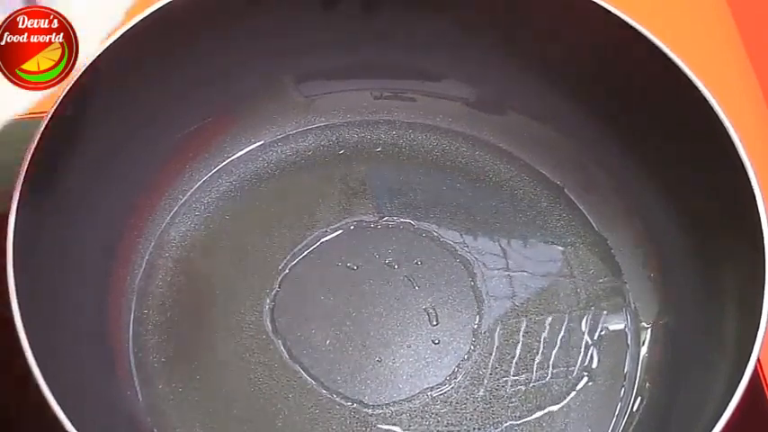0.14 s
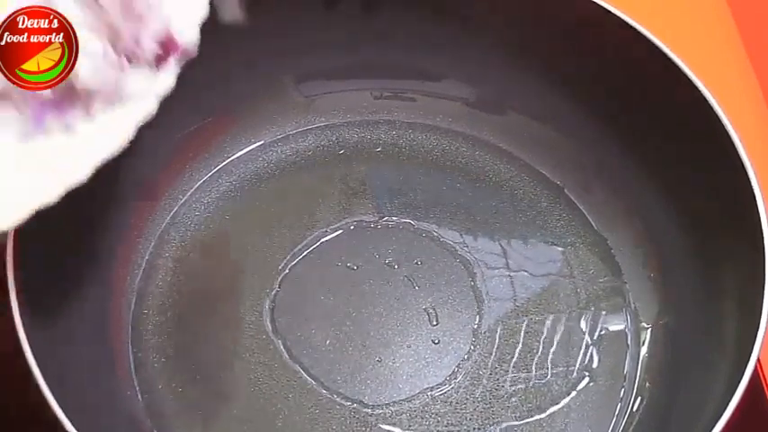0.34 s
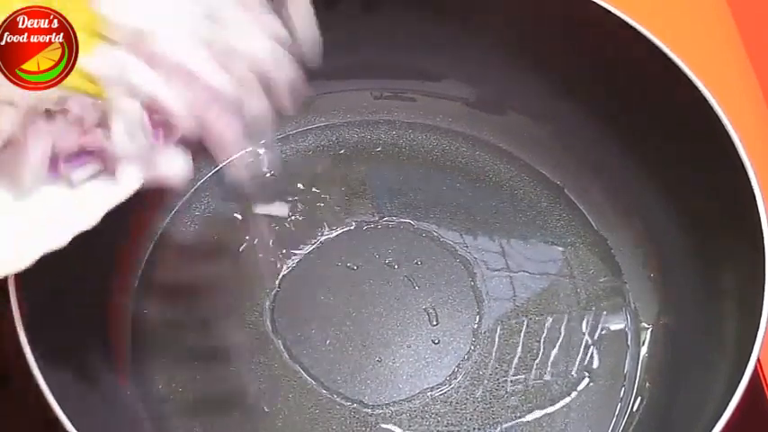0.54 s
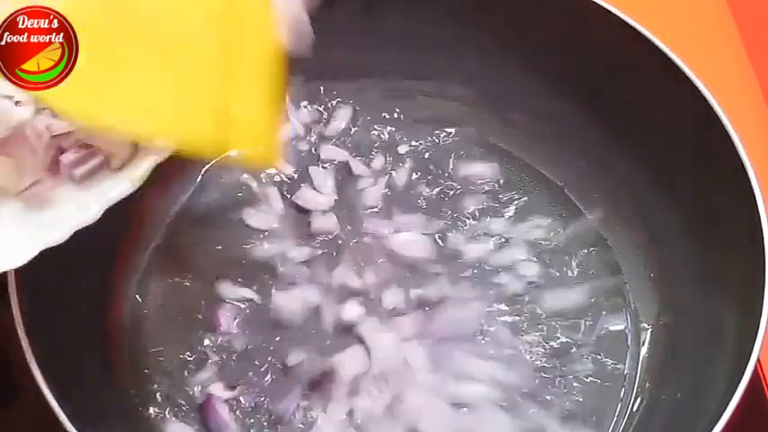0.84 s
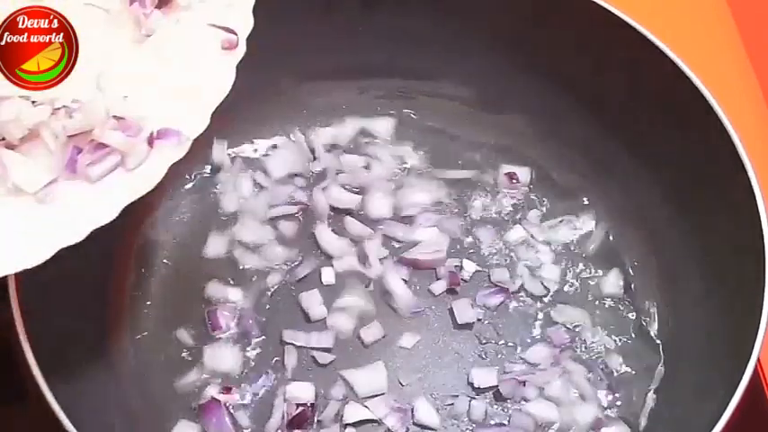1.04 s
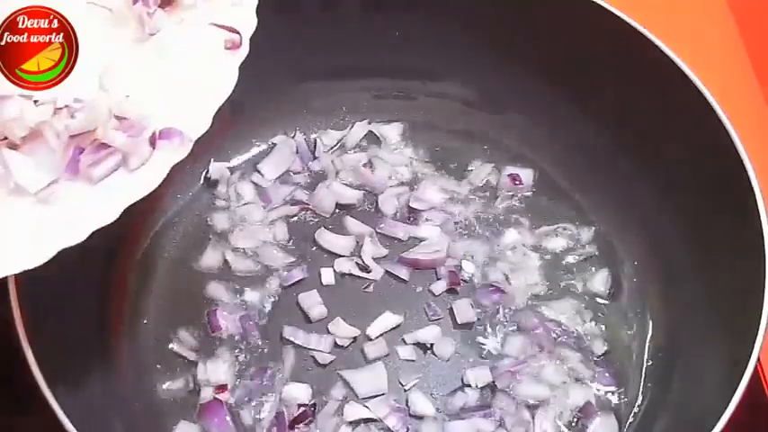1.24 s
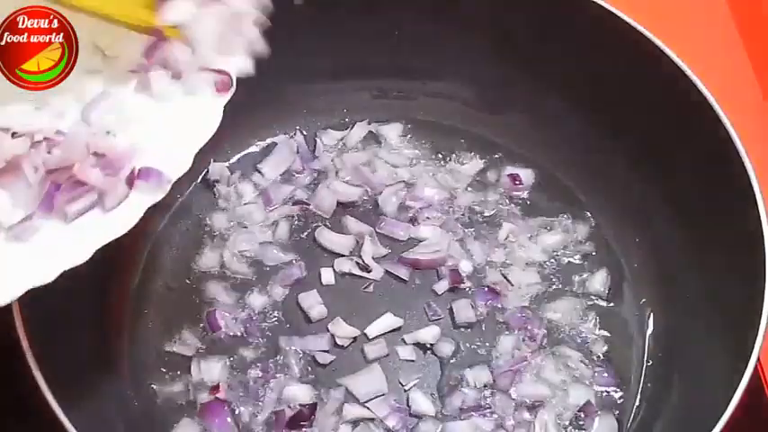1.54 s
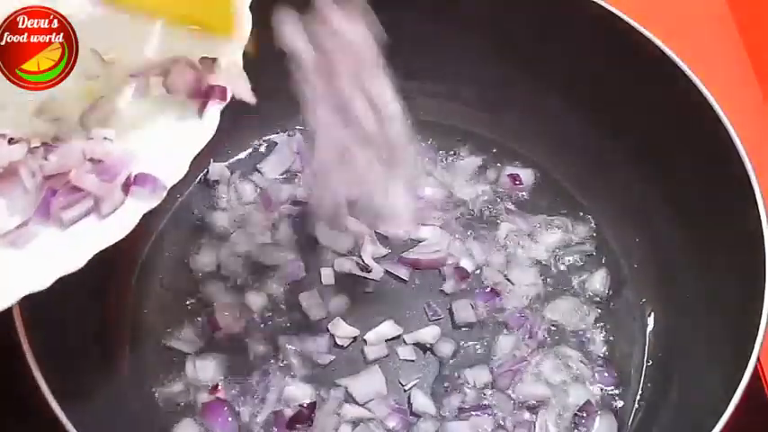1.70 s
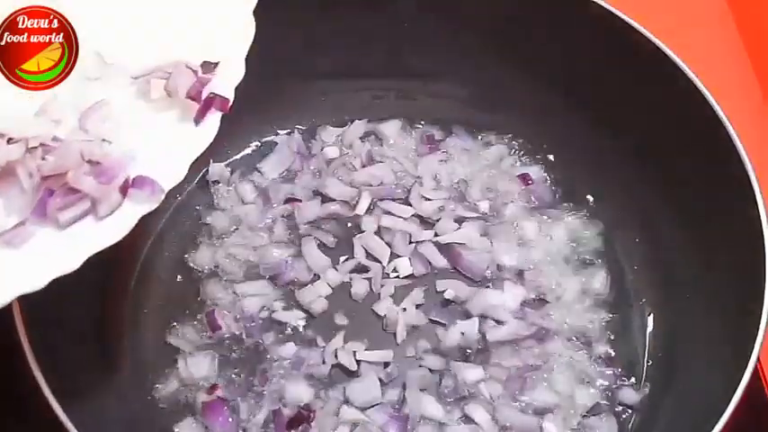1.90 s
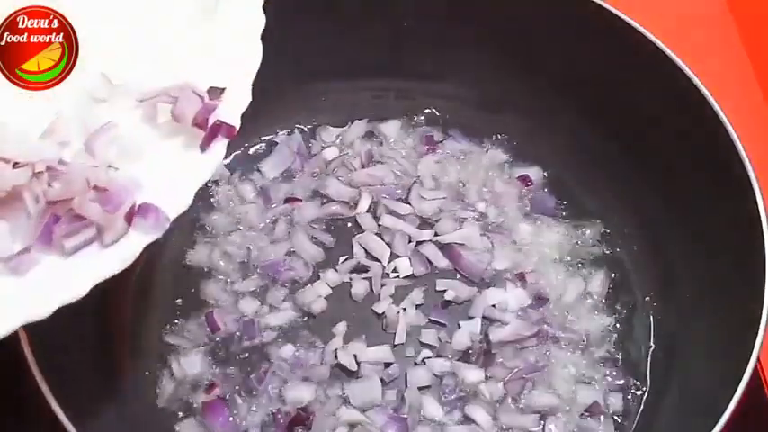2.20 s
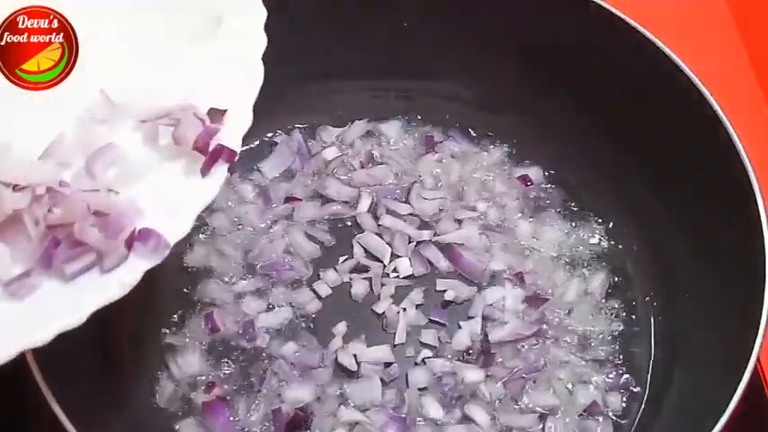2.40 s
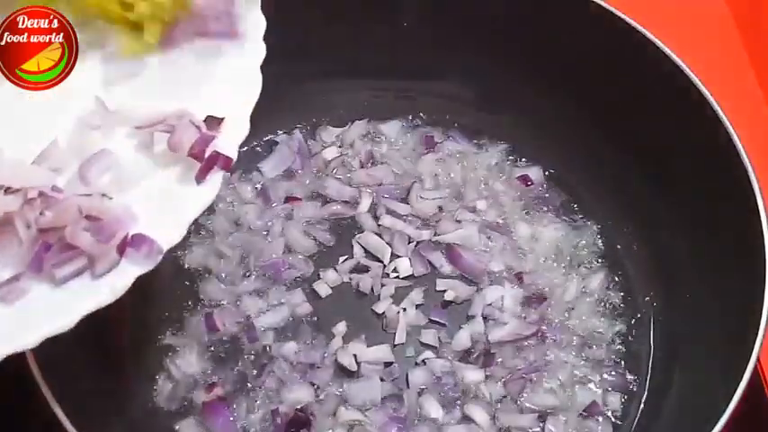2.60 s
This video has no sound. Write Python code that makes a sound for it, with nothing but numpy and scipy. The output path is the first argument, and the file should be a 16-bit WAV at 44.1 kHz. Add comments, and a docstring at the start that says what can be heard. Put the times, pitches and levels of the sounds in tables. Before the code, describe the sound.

Chopped onion drops into hot oil in a pan and sizzles with sharp spits.

```python
"""A small kitchen, one microphone close to a pan of hot oil, a low mains hum under everything.
A spatula knocks on a plate and a stray piece of chopped onion ticks on the pan. The first helping
follows: the pieces drum on the pan and make it ring, and their water flashes to steam in a dense
crackle with louder spits and brief squeaks. The spatula knocks again, a second helping lands
more softly, and the frying goes on."""
import sys
import numpy as np
from scipy import signal
from scipy.io import wavfile

SR = 44100
rng = np.random.default_rng(int(sys.argv[2]) if len(sys.argv) > 2 else 0)


def log_audio(samples):
    """Write samples as a 16-bit WAV file to the path given in sys.argv[1]."""
    # one column per channel
    frames = np.atleast_2d(samples).T
    # limit to full scale, then quantise
    limited = np.clip(frames, -1, 1)
    pcm = np.round(limited * 32767).astype(np.int16)
    wavfile.write(sys.argv[1], SR, pcm)


N = 121275
T = np.arange(N) / SR

# The pan's modes. Each row: pitch in Hz, relative level in dB, seconds to fall by 60 dB.
PAN_MODES = [(443.5, -2.5, 0.32), (515.4, -3.5, 0.23), (535.7, -7, 0.44), (574, -3, 0.15),
             (631, -3.5, 0.092), (691, -9, 0.17), (886, -6, .2), (971.6, 1.5, 0.064), (990, -4.5, 0.045),
             (1055.5, -10.5, 0.1), (1102, -4, 0.13), (1424, -5.5, 0.22), (1480, -6.5, 0.29),
             (2193, -8.5, 0.12), (2640, -7.5, 0.11)]


def from_db(db):
    """Decibels to gain."""
    return 10 ** (np.asarray(db) / 20)


def rms_one(x):
    """Scale to rms 1."""
    return x / np.sqrt(np.mean(x ** 2) + 1e-20)


def peak_at(x, db):
    """Scale to a peak level."""
    return from_db(db) * x / np.abs(x).max()


def at_hz(points, hz):
    """Read a spectrum on a log-frequency axis."""
    freqs, db = np.transpose(points)
    return np.interp(np.log(hz), np.log(freqs), db)


def band(x, hz, width):
    """Band-pass from hz / width to hz * width."""
    edges = [hz / width, min(hz * width, .47 * SR)]
    return signal.sosfilt(signal.butter(2, edges, "band", fs=SR, output="sos"), x + 1e-18)


def cut(x, kind, hz, order):
    """Low-pass or high-pass."""
    return signal.sosfilt(signal.butter(order, hz, kind, fs=SR, output="sos"), x + 1e-18)


def drift(rate_hz):
    """Slow random wander of spread 1."""
    step, settle = 40, 2000
    r = np.exp(-2 * np.pi * rate_hz * step / SR)
    white = rng.standard_normal(N // step + settle + 2)
    slow = signal.lfilter([1], [1, -2 * r, r * r], white)[settle:]
    return np.interp(np.arange(N) / step, np.arange(len(slow)), rms_one(slow))


def ring(force, modes):
    """A force drives damped modes of alternating sign, each at its own level."""
    out = 0
    for k, (hz, db, t60) in enumerate(modes):
        r, w = np.exp(-np.log(1000) / (t60 * SR)), 2 * np.pi * hz / SR
        mode = signal.lfilter([0, np.sin(w)], [1, -2 * r * np.cos(w), r * r], force + 1e-18)
        out = out + (-1) ** k * from_db(db) * mode
    return out


def noise(spectrum):
    """Noise coloured by half-octave bands; rms 1."""
    white = rng.standard_normal((2, N))
    centres = np.geomspace(28, 14336, 19)
    return rms_one(sum(from_db(at_hz(spectrum, hz)) * band(white[k % 2], hz, 2 ** .25)
                       for k, hz in enumerate(centres)))


def burst(decay_s, size=4096):
    """A puff of noise that starts at once and dies away."""
    return rng.standard_normal(size) * np.exp(-np.arange(size) / (decay_s * SR))


def place(start, sound):
    """A short sound set in silence at its start in seconds."""
    return np.pad(sound, (int(start * SR), N))[:N]


def background():
    """Mains hum and the dull air of the room, both weaker once the frying is under way."""
    # Each row: pitch in Hz, rms level in dB before the dip.
    hum_tones = [(49.3, -46.5), (66.5, -58.5), (99.5, -52)]
    # Each row: frequency in Hz, relative noise density in dB.
    air_spectrum = [(25, -30), (50, -2), (110, 2.5), (170, 0), (240, -4), (380, -11), (650, -7),
                    (1100, -11), (2000, -18.5), (7000, -26.5), (15000, -34)]
    hum = sum(np.sqrt(2) * from_db(db + .5 * drift(3)) * np.sin(2 * np.pi * (hz * T + rng.random()))
              for hz, db in hum_tones)
    dip_db = np.interp(T, [.75, 1.05], [0, -6])
    return (hum + from_db(-48.5) * noise(air_spectrum)) * from_db(dip_db)


def spatula():
    """The spatula knocks on the plate, which rings briefly."""
    # Each row: start in seconds, strength in dB.
    knocks = [(0.069, -47.5), (.208, -44), (1.278, -26)]
    # Each row: pitch in Hz, relative level in dB, seconds to fall by 60 dB.
    plate_modes = [(251, -16.5, 0.13), (1040, -6, 0.065), (1110, -0.5, 0.19), (1226, -19, 0.073),
                   (1830, -15, 0.15)]
    force = sum(place(start, [from_db(db)]) for start, db in knocks)
    return ring(force, plate_modes)


def stray_piece():
    """One piece falls early on the pan's wall: a tick that wakes only two of its modes."""
    # Each row: start in seconds, peak of the tick in dB.
    strays = [(0.4615, -25)]
    tick = sum(place(start, peak_at(band(burst(.005), hz=3760, width=1.45), db)) for start, db in strays)
    force = sum(place(start, [1]) for start, _ in strays)
    return tick + from_db(-37.5) * ring(force, [PAN_MODES[0], PAN_MODES[11]])


def sizzle():
    """Countless steam bubbles burst, each a tick of a few cycles; the smallest merge into a hiss."""
    # How hard the onion fries. Each row: time in seconds, level in dB.
    vigour = [(.528, -89), (.54, -46), (.58, -41.5), (.635, -49.5), (.655, -34), (.69, -38), (.75, -26.5),
              (.88, -25.5), (1.05, -28), (1.28, -31), (1.58, -30.5), (1.76, -30), (1.87, -26.5),
              (2.02, -27), (2.26, -28.5), (2.75, -28.5)]
    # Each row: frequency in Hz, relative noise density in dB.
    spectrum = [(250, -8), (500, -12.5), (1000, -5), (2000, -5.5), (3200, -2), (5000, 0), (7500, 2),
                (11000, -2), (15500, -14)]
    bubbles_per_s, spread_db, largest_db = 9000, 2.5, 15
    pitches = np.geomspace(500, 14500, 18)
    shares = np.sqrt(pitches) / np.sqrt(pitches).sum()
    crackle = 0
    for hz, share in zip(pitches, shares):
        bursts = rng.random(N) < bubbles_per_s * share / SR
        size_db = np.minimum(spread_db * rng.exponential(1, N), largest_db)
        clicks = bursts * from_db(size_db) * rng.choice([-1, 1], N)
        ticks = rms_one(band(clicks, hz, width=1.347))
        band_db = at_hz(spectrum, hz) + 3.3 * drift(39)  # each band flickers on its own
        crackle = crackle + from_db(band_db) * np.sqrt(hz) * ticks
    fry = from_db(-.5) * rms_one(crackle) + from_db(-5.5) * noise(spectrum)
    # The first spatter is thin; large, low bubbles come once the onion lies in the oil.
    thin = cut(fry, "high", hz=4200, order=2)
    fullness = np.interp(T, [.59, .78], [0, 1])
    level_db = np.interp(T, *np.transpose(vigour)) + 1.5 * drift(40)
    return from_db(level_db) * (fullness * fry + (1 - fullness) * thin)


def spits():
    """Larger drops of water burst with a pitched snap and a broad crack, and nudge the pan."""
    # Each row: start in seconds, peak in dB, pitch in Hz, decay in seconds, gain of the crack in dB.
    drops = [(0.585, -24.5, 6960, .004, -3), (.699, -9, 5300, 0.0017, -12), (0.715, -9, 6100, .002, -8),
             (0.7487, -7.5, 5740, 0.00067, -3), (0.7776, -20, 9600, 0.00083, -13),
             (.821, -9, 5470, 0.0014, -29), (.8267, -4, 7000, 0.00086, -4),
             (0.8445, -7, 7200, 0.00069, -10), (0.87, -8.5, 5130, 0.0029, -17),
             (.900, -4, 7740, 0.0021, -2), (.9749, -3.5, 8800, 0.0004, -16),
             (1.0403, -10.5, 9500, 0.00086, -13), (1.054, -8, 6700, 0.00061, -14),
             (1.089, -12.5, 2900, 0.0064, -5), (1.1555, -2, 9000, 0.00062, -23),
             (1.197, -13.5, 6300, .001, -14), (1.310, -7.5, 10800, 0.002, -5.5),
             (1.4739, -12.5, 6700, 0.0028, -9), (1.5021, -12.5, 8850, 0.0013, -26),
             (1.591, -7, 8800, 0.0014, -4.5), (1.6208, -10.5, 7400, 0.0013, -7.5),
             (1.7002, -14, 10200, .0004, -13), (1.823, -17, 2000, 0.0068, -5),
             (1.9285, -7, 9450, 0.00033, -8), (1.999, -8.5, 9750, 0.00042, -25),
             (2.016, -8, 10500, 0.00071, -8), (2.042, -10, 9900, 0.00095, -18),
             (2.0458, -6.5, 6760, .0006, -9), (2.0878, -7.5, 7900, 0.001, -20),
             (2.0948, -15, 7300, .001, -16), (2.1077, -27, 9800, 0.00055, -12),
             (2.1568, -23, 5400, .0015, -20), (2.183, -4, 8000, 0.00084, -3),
             (2.1882, -9.5, 8000, 0.0011, -12), (2.225, -4.5, 6960, 0.001, -3),
             (2.229, -7, 4400, 0.0014, -9), (2.358, -18.5, 3260, 0.0018, -3),
             (2.5831, -11.5, 6060, 0.00087, -1.5), (2.622, -16.5, 3020, 0.0028, -7),
             (2.7154, -14, 5860, 0.00075, -3)]
    pops, kicks = 0, 0
    for start, db, hz, decay_s, crack_db in drops:
        puff = burst(decay_s)
        snap = band(puff, hz, width=1.328)
        crack = from_db(crack_db) * band(puff, hz=2340, width=8.6)
        pops = pops + place(start, peak_at(snap + crack, db))
        kicks = kicks + place(start, [from_db(db + crack_db - 33.5)])
    return pops + ring(kicks, PAN_MODES)


def landing_onion():
    """Each clump is a quick patter of soft pieces that thud on the pan and set it ringing."""
    # Clumps land softer on other onion. Each row: start in seconds, strength in dB, treble cut in Hz.
    clumps = [(.644, -21.5, 1820), (.662, -13, 1650), (.683, -17.5, 1600), (.705, -18.5, 1620),
              (.728, -9.5, 2150), (0.746, -9.5, 1830), (.764, -16, 1650), (0.782, -10.5, 1570),
              (.802, -7, 2800), (.813, -10, 2680), (0.837, -22, 2020), (.860, -17.5, 1500),
              (.893, -20.5, 1210), (.916, -19.5, 1230), (0.95, -23, 1100), (1.024, -20.5, 1290),
              (1.088, -28, 1320), (1.786, -26, 900), (1.821, -15.5, 1710), (1.856, -18, 1000),
              (1.887, -19, 820), (1.921, -24, 600), (1.965, -31.5, 550)]
    # Broad humps of the dull thud. Each row: centre in Hz, relative level in dB, width as a ratio.
    thud_bands = [(565, -1, 1.22), (924, 0, 1.124), (2220, -14, 1.53)]
    pieces_per_s, ring_db, thud_db = 2800, -40, -1
    force = 0
    for start, db, dull_hz in clumps:
        patter = burst(decay_s=.012)
        patter *= rng.random(len(patter)) < pieces_per_s / SR
        patter[0] = 2  # a firm first contact
        push = cut(patter, "low", dull_hz, order=4)
        midrange_peak = np.abs(band(push, hz=740, width=1.55)).max()
        force = force + place(start, from_db(db) * push / midrange_peak)
    rings = sum(from_db(ring_db + db) * rms_one(band(ring(force, [(hz, 0, t60)]), hz, width=1.116))
                for hz, db, t60 in PAN_MODES)
    thuds = sum(from_db(thud_db + db) * band(force, hz, width) for hz, db, width in thud_bands)
    body = cut(rings + thuds, "high", hz=360, order=4)  # the pan's ring and thud carry little bass
    thump = peak_at(band(force, hz=211, width=1.24), db=-31)
    return body + thump


def squeaks():
    """Steam trapped under a piece escapes in brief narrow whistles."""
    # Each row: start in seconds, peak in dB, pitch in Hz, decay in seconds.
    whistles = [(0.7, -17.5, 5430, 0.0058), (.745, -14, 5600, 0.0031), (1.474, -17, 3140, 0.0079),
                (1.523, -24.5, 3530, 0.0087)]
    return sum(place(start, peak_at(band(burst(decay_s), hz, width=1.088), db))
               for start, db, hz, decay_s in whistles)


def kitchen(direct):
    """One close reflection and a short diffuse tail reach the microphone after the direct sound."""
    delay_s, echo_db, tail_db, t60_s = .0048, -14.5, -9, .42
    tail = burst(t60_s / np.log(1000), size=16384)
    reverb = signal.fftconvolve(direct, tail / np.linalg.norm(tail))[:N]
    return direct + place(delay_s, from_db(echo_db) * direct + from_db(tail_db) * reverb)


def scene():
    """The cooking, heard from close by in the kitchen over its background; mono."""
    cooking = spatula() + stray_piece() + sizzle() + spits() + landing_onion() + squeaks()
    return (kitchen(cooking) + background())[None]


def record(dry):
    """The top is cut steeply above 15.6 kHz."""
    return signal.sosfilt(signal.ellip(12, .1, 90, 15600, fs=SR, output="sos"), dry)


dry = scene()
out = record(dry)
log_audio(out)
```